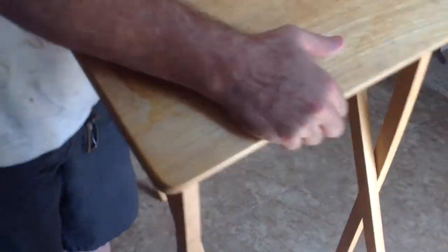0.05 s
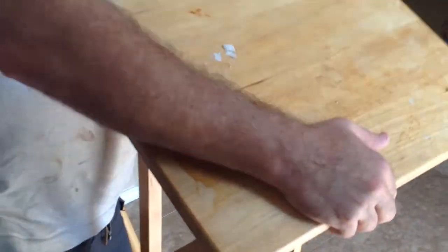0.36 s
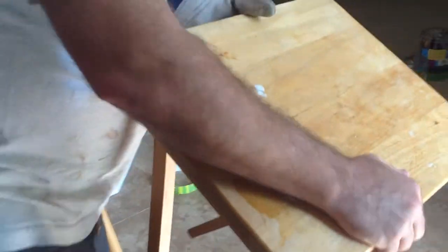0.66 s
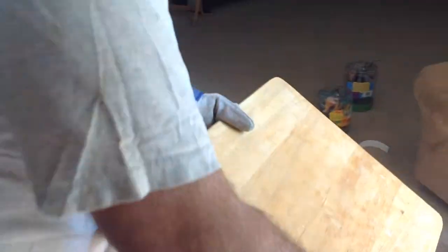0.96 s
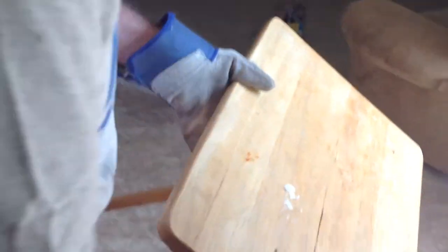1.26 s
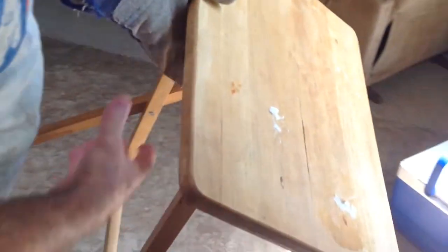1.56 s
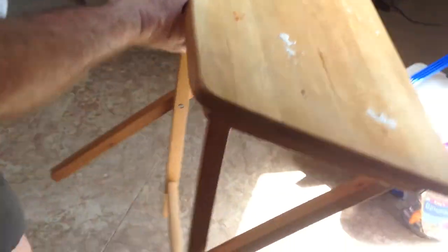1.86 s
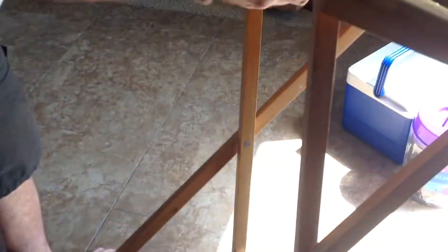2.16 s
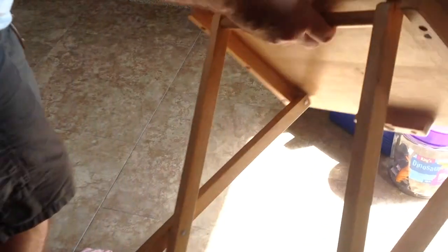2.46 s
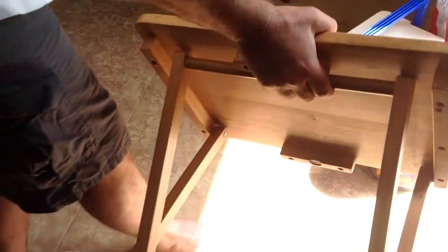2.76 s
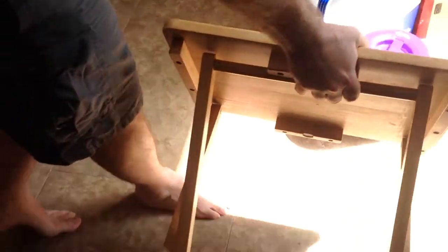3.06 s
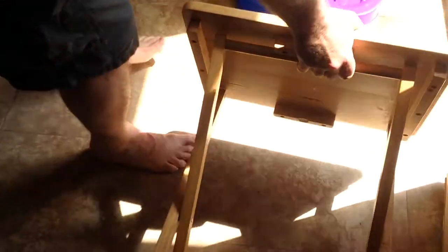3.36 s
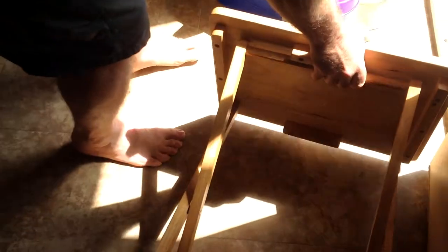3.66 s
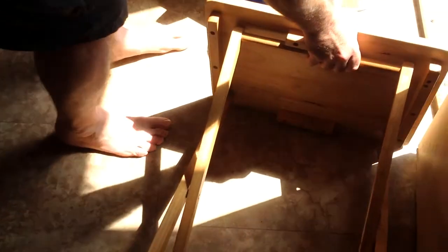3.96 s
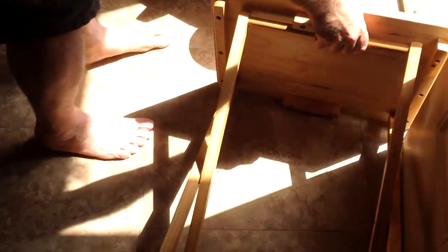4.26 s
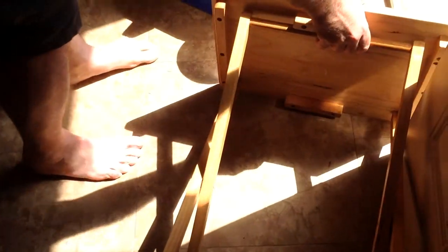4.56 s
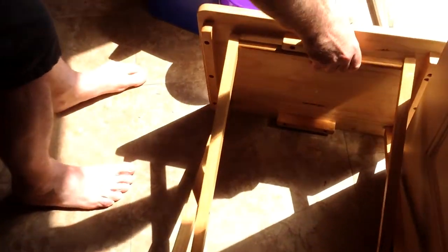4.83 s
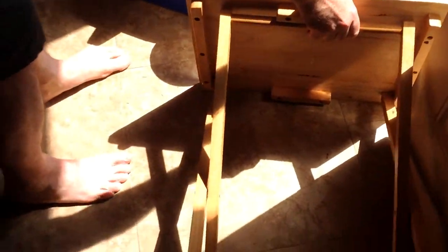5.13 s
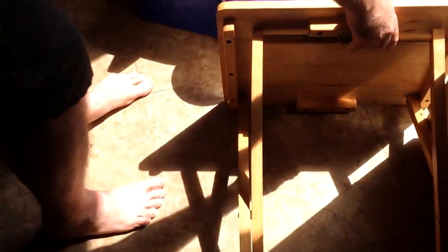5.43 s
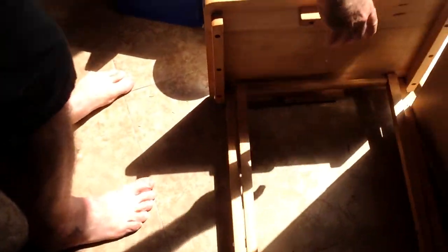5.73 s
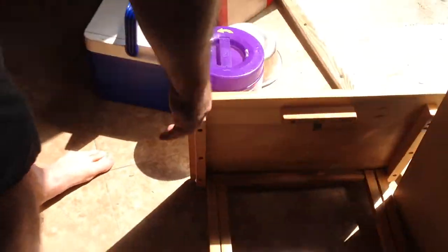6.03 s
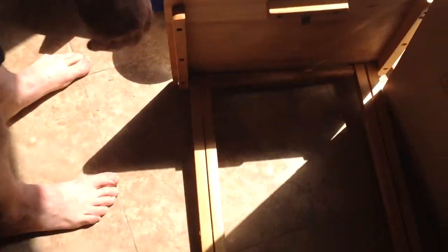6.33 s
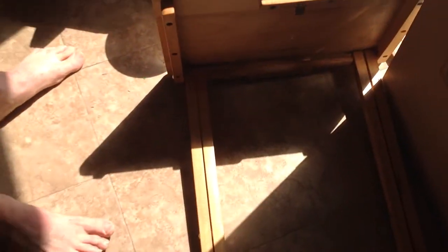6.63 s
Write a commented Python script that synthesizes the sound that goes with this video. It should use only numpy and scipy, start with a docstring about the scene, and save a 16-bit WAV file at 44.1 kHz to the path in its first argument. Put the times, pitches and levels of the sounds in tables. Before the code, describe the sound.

A wooden tray table is handled and folded in a tiled room: soft brushing, knocks, a scrape, then loud clacks.

```python
"""A soft brush of hands, then sharp knocks: a wooden folding tray table is lifted and turned in a tiled room.
Skin and sleeves hiss over the top, the feet tap the tiles, and the leg frames scrape along their guides,
then clap shut and rattle to rest. Each impact excites damped modes of the wood; friction gives noise that
grows with speed. The room reverberates after every blow, over faint room tone and a low hum, and the
limiter of a small camera close by flattens the loudest blows."""
import sys
import numpy as np
from scipy import signal
from scipy.fft import rfft, irfft, next_fast_len
from scipy.io import wavfile
from scipy.ndimage import uniform_filter1d, map_coordinates

SR = 44100
rng = np.random.default_rng(int(sys.argv[2]) if len(sys.argv) > 2 else 0)


def unload_audio(sound):
    """Save the sound as a 16-bit wav file, at the path given as the first command line argument."""
    columns = np.transpose(np.atleast_2d(sound))
    # keep every value between -1 and 1, then stretch to whole-number steps
    steps = np.round(np.clip(columns, -1, 1) * 32767)
    wavfile.write(sys.argv[1], SR, steps.astype(np.int16))


N = 295029
T = np.arange(N) / SR

# Spectrum of the room tone: f/Hz, level/dB
AIR_SPECTRUM = [(25, -38.5), (55, -12.5), (100, -10.5), (135, 0.5), (190, 5.5), (310, 2), (420, -0.5),
                (650, -8), (1100, -10), (1800, -11.5), (2600, -18), (6000, -20.5), (10000, -24.5),
                (15000, -27)]
# Spells of low hum: start/s, end/s, f/Hz, level/dB
HUMS = [(0, .15, 81, -64.5), (.65, 1.55, 80.5, -66), (2.95, 3.4, 72.5, -75)]
# Reverberation time of the tiled room: f/Hz, T60/s
ROOM_T60 = [(150, 0.6), (400, 0.45), (1000, 0.53), (2800, 0.42), (7000, 0.41), (14000, 0.31)]

# Sweeps of hands and sleeves: t/s at the fastest, duration/s, level/dB
SWEEPS = [(0.034, 0.14, -47.5), (.15, 0.26, -45.5), (0.392, 0.21, -45.5), (1.27, 0.1, -65.5),
          (1.744, 0.23, -49), (1.935, 0.79, -57.5), (2.243, 0.13, -57), (2.947, .07, -53.5),
          (3.17, 0.098, -59), (4.308, .14, -49), (4.453, 0.1, -46), (5.35, 0.23, -59.5), (6.42, 0.21, -61),
          (6.585, 0.11, -58.5)]
# Spectra of brushing and of wood sliding on wood: f/Hz, level/dB
BRUSH_SPECTRUM = [(100, -19), (400, 3.5), (1000, -6), (1700, -9.5), (3000, -3.5), (5500, -1), (8000, -7),
                  (11000, -15.5), (15000, -23)]
SLIDE_SPECTRUM = [(60, -43), (160, 2), (300, 11), (450, 1), (850, -4), (1200, -5), (1800, 0), (3200, -6.5),
                  (6000, -11), (9000, -22.5), (15000, -41.5)]
# Pushes along the guides and turns of the tight pivot: start/s, duration/s, final level/dB
PUSHES = [(3.89, 0.049, -37.5), (3.97, 0.41, -39.5), (4.38, 0.2, -40), (4.86, 0.026, -53.5),
          (4.96, 0.073, -54), (5.42, 0.23, -37.5)]
PIVOT_TURNS = [(3.9, .045, -41.5), (3.98, 0.14, -62)]
# Resonances of the rubbed rails and of the pivot: f/Hz, half-width/Hz, level/dB
RAIL_RESONANCES = [(845, 28, 5), (1610, 50, -4), (2094, 89, -11), (2800, 60, 4.5), (3495, 70, 3),
                   (4620, 60, -6)]
PIVOT_RESONANCES = [(2480, 170, 6), (5040, 130, 6)]
# Tiny dry ticks: t/s, level/dB
TICKS = [(5.197, -44), (5.23, -39), (5.349, -40), (6.475, -50)]

# Registers of an impact (boom, knock, clack, edge): lower f/Hz, upper f/Hz
REGISTERS = [(150, 420), (420, 1480), (1400, 4000), (4000, 6800)]
# Register weights of the standing table, top board and leg frames: boom/dB, knock/dB, clack/dB, edge/dB
STANDING_VOICE = (0.65, 0.2, 1, -0.1)
BOARD_VOICE = (1.1, 0.14, 0.83, -1)
LEG_VOICE = (-7, -7.5, 1.4, 1.3)
# Distinct modes of the same three bodies: f/Hz, level/dB, T60/s
STANDING_MODES = [(149, -6.5, 0.14), (172, -5.5, 0.14), (246, -1.5, 0.36), (324, 9.5, 0.13),
                  (497, -2.5, 0.092), (592, 0.5, 0.1), (759, 3, 0.15), (890, 18, 0.026), (1090, 5.5, 0.059),
                  (1394, 6.5, 0.043), (1606, -15.5, 0.15), (1950, -15.5, 0.085), (1907, -5.5, 0.1),
                  (2178, 2, 0.02), (2440, -9.5, 0.086), (3060, -2.5, 0.07), (3690, 1, 0.041),
                  (4910, -19, 0.13)]
BOARD_MODES = [(181.4, -13.5, 0.14), (275.7, -9.5, 0.81), (318.2, 8, 0.16), (440.5, -12, 0.32),
               (564, -2.5, 0.11), (669, -23, 0.16), (824, -1, 0.067), (891, 9, 0.041), (920, -16.5, 0.16),
               (1062, 3, 0.07), (1283, -18, 0.091), (1370, -5, 0.076), (1678, 1.5, 0.082),
               (1790, -7.5, 0.018), (1826, 7.5, 0.038), (2115, -1.5, 0.075), (2440, -13.5, 0.058),
               (2747, -12, 0.031)]
LEG_MODES = [(163.6, -12.5, 0.049), (258, 3, 0.12), (324.4, 8, 0.092), (413, 5, 0.12), (584, -18, 0.014),
             (866, 6, 0.081), (2040, 2, 0.02), (2635, -29, 0.13), (2780, 6.5, 0.036), (2950, 6.5, 0.032),
             (3416, -3, 0.21), (4800, -14.5, 0.064)]
# Spectra of their crowded, short-lived modes: f/Hz, level/dB
STANDING_DENSE = [(70, -17), (130, 13.5), (260, 14), (450, 7), (750, 16.5), (1200, 5.5), (1800, 10),
                  (3000, 1.5), (5000, -8.5), (7000, -15.5)]
BOARD_DENSE = [(100, -16), (200, -17.5), (280, -6), (450, 3), (750, 0.5), (1100, -4.5), (1800, 4),
               (3000, 1.5), (5000, -9.5), (7000, -17.5)]
LEG_DENSE = [(100, -3.5), (190, 6.5), (300, 6), (600, 2), (1200, -1), (1600, -4), (2400, 1), (3600, -2),
             (5500, -6), (7500, -10.5)]
# Spectrum of the contact itself: f/Hz, level/dB
CRACK_SPECTRUM = [(30, -10), (70, -13), (150, 6), (1000, -10), (7500, 11.5), (10000, 3), (12500, -10),
                  (15500, -10.5)]
# Impacts of feet on tiles, frame on top and leg on leg: t/s, strength/dB, contact pitch f/Hz
FOOTFALLS = [(3.277, -19.5, 3620), (3.283, -21.5, 2050), (3.367, -24, 1990), (3.881, -20, 864),
             (3.908, -22.5, 277), (3.944, -28.5, 298), (3.992, -30, 248), (4.438, -22.5, 422),
             (4.462, -24, 650), (4.482, -21.5, 1970), (4.502, -24.5, 254), (4.527, -24, 2100),
             (4.598, -36.5, 4100), (4.712, -43, 308), (4.899, -45.5, 497), (5.051, -30.5, 166),
             (5.071, -33, 166)]
KNOCKS = [(.363, -5.5, 1007), (.412, -22.5, 1400), (.419, -18.5, 778), (.433, -24, 400),
          (.556, -31.5, 1370), (.604, -22, 520), (.637, -20, 1620), (.959, -37, 706), (1.018, -37.5, 650),
          (1.147, -43, 580), (1.178, -49, 734), (1.75, -30, 1300), (1.815, -38.5, 2840), (1.981, -42, 750),
          (2.099, -35, 4010), (2.105, -39, 308), (5.394, -38.5, 900), (5.45, -36, 1350), (5.454, -34, 249),
          (5.772, -14.5, 330), (5.787, -15.5, 292), (5.811, -21, 248)]
CLAPS = [(5.701, 1.5, 4430), (5.742, -8, 4230), (5.855, -8, 4000), (5.867, -10.5, 2620), (5.952, -15, 3230),
         (5.965, -14, 3030), (6.018, -16, 4060), (6.035, -14.5, 2800), (6.069, -12, 318),
         (6.118, -27, 2320), (6.149, -24, 2140), (6.198, -34.5, 1900)]


def amp(db):
    """Amplitude ratio of a level: 20 dB to a factor of ten."""
    return 10 ** (np.asarray(db) / 20)


def unit(x):
    """Normalisation to rms 1."""
    return x / np.sqrt(np.mean(x ** 2) + 1e-20)


def along(points, hz):
    """Interpolation of (f/Hz, value) points on a logarithmic frequency axis."""
    f, values = np.transpose(points)
    return np.interp(np.log(hz + 1), np.log(f + 1), values)


def wobble(rate):
    """Random modulation: a smooth curve through rate knots a second."""
    return map_coordinates(rng.standard_normal(int(N * rate / SR) + 4), [T * rate])


def filtered(x, response):
    """Linear filtering: the spectrum of x times a frequency response."""
    size = next_fast_len(len(x) + 8192)
    return irfft(rfft(x, size) * response(np.fft.rfftfreq(size, 1 / SR)), size)[:len(x)]


def coloured(x, spectrum):
    """Spectral shaping by (f/Hz, level/dB) points, at rms 1."""
    return unit(filtered(x, lambda hz: amp(along(spectrum, hz))))


def add(track, start, x):
    """Superposition of x on the track from start, in seconds."""
    part = track[round(start * SR):][:len(x)]
    part += x[:len(part)]


def background():
    """Broadband room tone settles; a low hum, modulated in pitch and level, comes and goes."""
    air_db = -56.3 + 5.5 * np.exp(-T / 1.13)
    out = amp(air_db + 0.7 * wobble(20)) * coloured(rng.standard_normal(N), AIR_SPECTRUM)
    for start, end, hz, db in HUMS:
        phase = 2 * np.pi * np.cumsum(hz * (1 + 0.023 * wobble(4.6))) / SR
        fade_db = 40.5 * np.abs(T - np.clip(T, start, end))  # fades on both sides of the spell
        out += amp(db - fade_db + 0.63 * wobble(7.4)) * unit(np.sin(phase))
    return out


def in_room(x, wet_db):
    """Reverberation: a diffuse field from tiles and walls follows x, the treble dying first."""
    hz, t, noise = signal.stft(rng.standard_normal(SR * 3 // 4), SR, nperseg=256)
    build_up = 1 - np.exp(-t / 0.002)
    decay = amp(-60 * t / along(ROOM_T60, hz)[:, None])
    tail = signal.istft(noise * build_up * decay, SR, nperseg=256)[1]
    response = amp(wet_db) * tail / np.linalg.norm(tail)
    response[0] += 1  # direct sound
    return signal.fftconvolve(x, response)


def brushing():
    """Friction noise of skin and cloth on the top: each sweep swells quickly and dies more slowly."""
    rise_share, ends_db = .38, -17
    fibres = rng.standard_normal(N) * amp(1.6 * wobble(500) + 1.8 * wobble(40))
    envelope = np.zeros(N)
    for peak, duration, db in SWEEPS:
        from_peak = np.maximum((peak - T) / rise_share, (T - peak) / (1 - rise_share)) / duration
        envelope += amp(db + ends_db * from_peak ** 2.1)
    return envelope * coloured(fibres, BRUSH_SPECTRUM)


def resonances(peaks, f):
    """Resonance: the gain at frequencies f is a sum of Lorentzian peaks."""
    return sum(amp(db) / (1 + ((f - hz) / width) ** 2) for hz, width, db in peaks)


def pushed(pushes, brake_db_per_s=207.5):
    """Friction amplitude follows speed: uniform acceleration from rest, then exponential braking."""
    envelope = np.zeros(N)
    for start, duration, db in pushes:
        speed = np.clip((T - start) / duration, 0, 1)
        braking_db = brake_db_per_s * np.maximum(T - start - duration, 0)
        envelope += amp(db - braking_db) * speed
    return envelope


def sliding():
    """Friction drives resonances: the frames scrape along their guides and a tight pivot whistles."""
    slips = rng.standard_normal(N) * amp(2.7 * wobble(400) + 1.4 * wobble(35))
    rails = filtered(slips, lambda f: 1 + resonances(RAIL_RESONANCES, f))
    pivot = filtered(slips, lambda f: resonances(PIVOT_RESONANCES, f))
    scrape = pushed(PUSHES) * coloured(rails, SLIDE_SPECTRUM)
    whistle = pushed(PIVOT_TURNS) * unit(pivot)
    return in_room(scrape + whistle, wet_db=-10.5)[:N]


def ticks():
    """Direct sound alone: faint, quickly damped clicks right by the microphone."""
    out, t = np.zeros(N), np.arange(SR // 50) / SR
    for start, db in TICKS:
        click = 0.55 * rng.standard_normal(len(t)) + np.sin(2 * np.pi * 1700 * t)
        add(out, start, amp(db - 60 * t / 0.013) * click)
    return out


def blow(levels, modes, dense_spectrum, dense_db, crack_db):
    """Free vibration after one impact: distinct damped modes, a dense rattle and the contact's crack."""
    t = np.arange(SR // 3) / SR
    hz, db, t60 = np.transpose(modes)[:, :, None]
    strength = amp(db + 3.6 * rng.standard_normal(hz.shape)) * rng.choice([-1, 1], hz.shape)
    hz = hz * (1 + 0.0051 * rng.standard_normal(hz.shape))  # the grip detunes the wood a little
    ring = np.sum(strength * amp(-60 * t / t60) * np.sin(2 * np.pi * hz * t), axis=0)
    rattle = amp(dense_db) * coloured(rng.standard_normal(len(t)), dense_spectrum)
    out = np.zeros(len(t))
    for (low, high), level in zip(REGISTERS, levels):
        rattle_t60 = .05 * (1000 / low) ** 0.24  # high modes die sooner
        bandpass = signal.butter(3, (low, high), "bandpass", fs=SR, output="sos")
        band = signal.sosfilt(bandpass, ring + rattle * amp(-60 * t / rattle_t60))
        onset_rms = np.sqrt(np.mean(band[:SR // 80] ** 2))
        out += amp(level) * band / onset_rms
    crack = coloured(rng.standard_normal(len(t)), CRACK_SPECTRUM)
    out += amp(levels[-1] + crack_db - 60 * t / 0.0072) * crack
    contact_s = 0.00011 * amp(-.6 * max(levels))  # gentler blows press together more slowly
    return out * (1 - np.exp(-t / contact_s))


def struck(impacts, voice, modes, dense_spectrum, dense_db, crack_db, wet_db):
    """Impact excitation of one body: energy peaks at the contact pitch, higher for a harder contact."""
    below_db_per_octave, above_db_per_octave = 3.5, 8
    centres = np.sqrt(np.prod(REGISTERS, axis=1))
    out = np.zeros(N)
    for start, db, contact_hz in impacts:
        octaves = np.log2(centres / contact_hz)
        roll_off_db = np.maximum(-below_db_per_octave * octaves, above_db_per_octave * octaves)
        levels = db + np.array(voice) - roll_off_db
        direct = blow(levels, modes, dense_spectrum, dense_db, crack_db)
        add(out, start, in_room(direct, wet_db))
    return out


def footfalls():
    """The feet tap and land on the tiles, exciting the modes of the whole standing table."""
    return struck(FOOTFALLS, STANDING_VOICE, STANDING_MODES, STANDING_DENSE,
                  dense_db=18.5, crack_db=0.5, wet_db=-6)


def knocks():
    """The loose frame strikes the top board close by, which radiates at its natural frequencies."""
    return struck(KNOCKS, BOARD_VOICE, BOARD_MODES, BOARD_DENSE, dense_db=13, crack_db=1, wet_db=-7)


def claps():
    """Inelastic collisions: the legs slam shut and rebound to rest by the tiles, stirring the room more."""
    return struck(CLAPS, LEG_VOICE, LEG_MODES, LEG_DENSE, dense_db=20, crack_db=0, wet_db=-4.5)


def scene():
    """Superposition of all sources at the microphone."""
    return (knocks() + footfalls() + claps() + ticks() + sliding() + brushing() + background())[None]


def limited(x, ceiling, release_db_per_s):
    """Limiting: the gain drops as the short-term rms passes the ceiling, then recovers steadily."""
    rms = np.sqrt(np.abs(uniform_filter1d(x ** 2, size=88)))
    excess_db = 20 * np.log10(np.maximum(rms / ceiling, 1))
    cut_db = np.maximum.accumulate(excess_db + release_db_per_s * T) - release_db_per_s * T
    return x * amp(-cut_db)


def record(dry):
    """Asymmetric saturation: the camera limits loud blows and rounds them unevenly, adding a low thud."""
    x = limited(dry[0], ceiling=0.33, release_db_per_s=822)
    clip_level = np.where(x > 0, .66, .78)
    rounded = x / (1 + (x / clip_level) ** 8) ** (1 / 8)
    return filtered(rounded, lambda hz: (hz > 18) * (hz < 15500))[None]


dry = scene()
out = record(dry)
unload_audio(out)
```